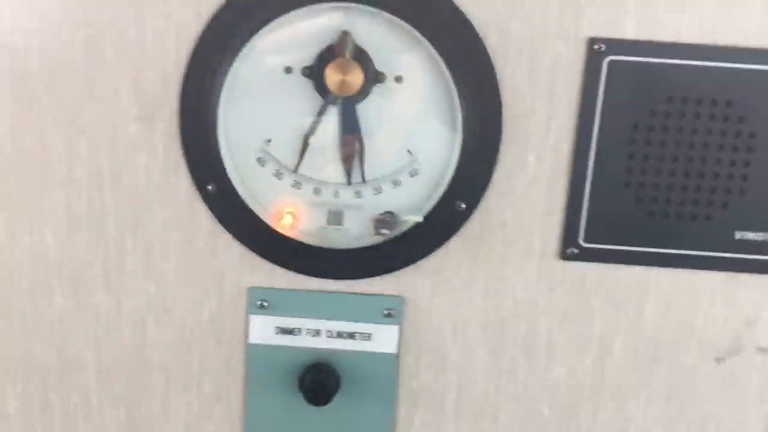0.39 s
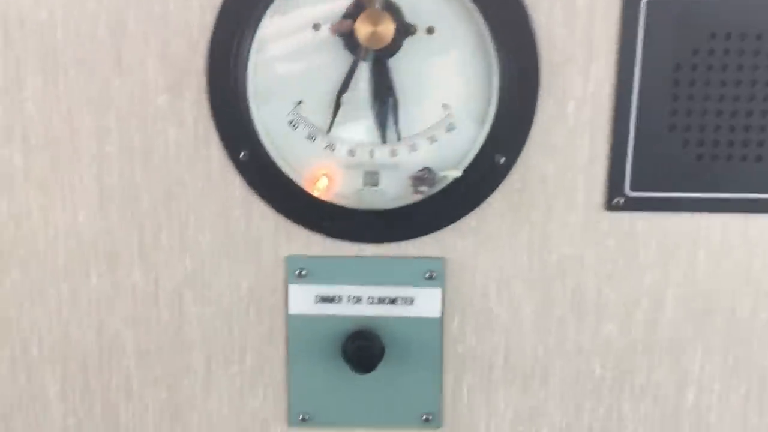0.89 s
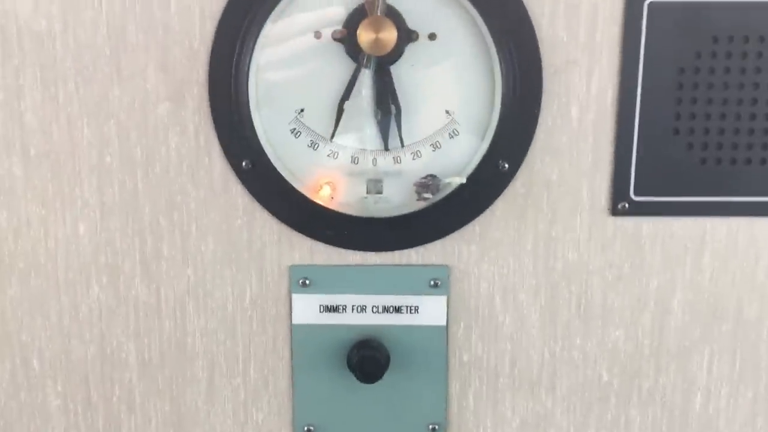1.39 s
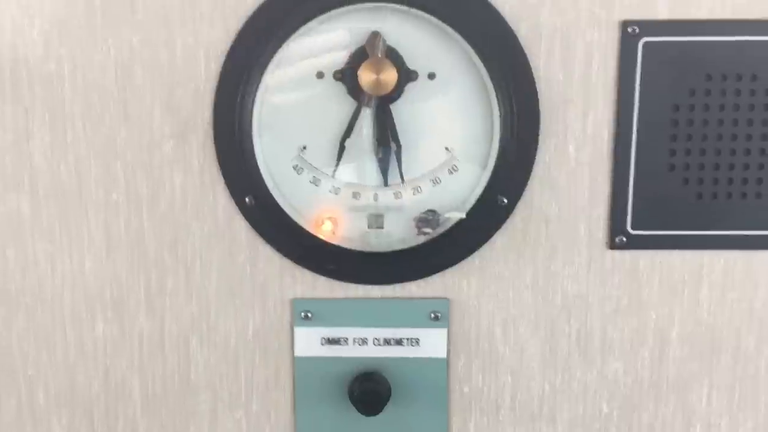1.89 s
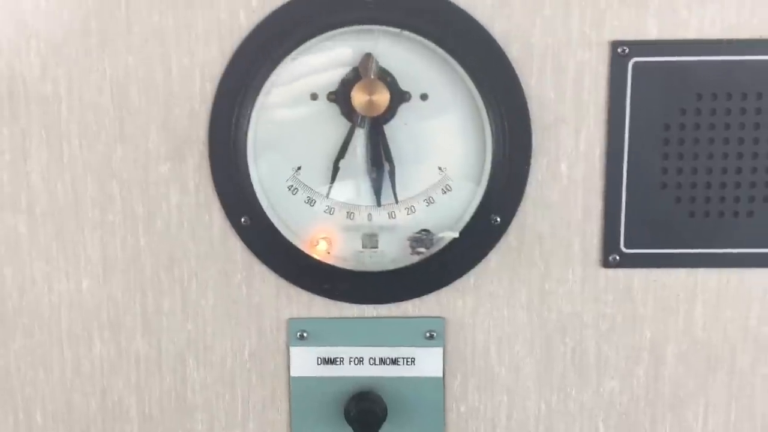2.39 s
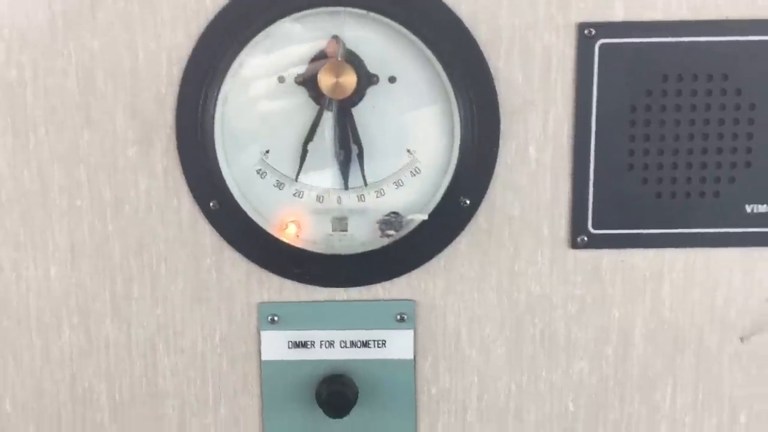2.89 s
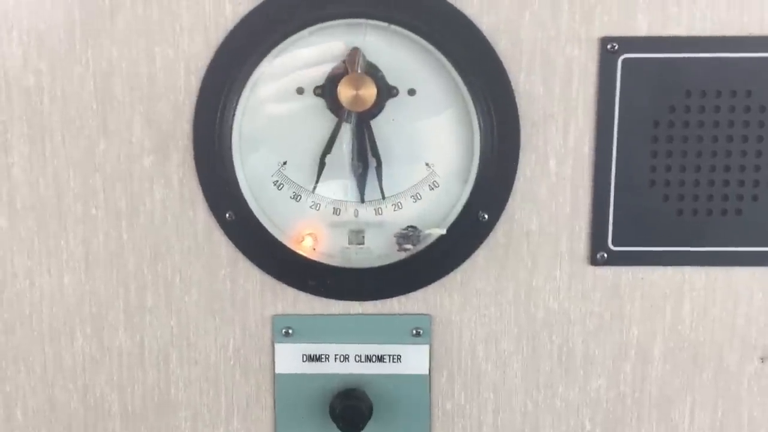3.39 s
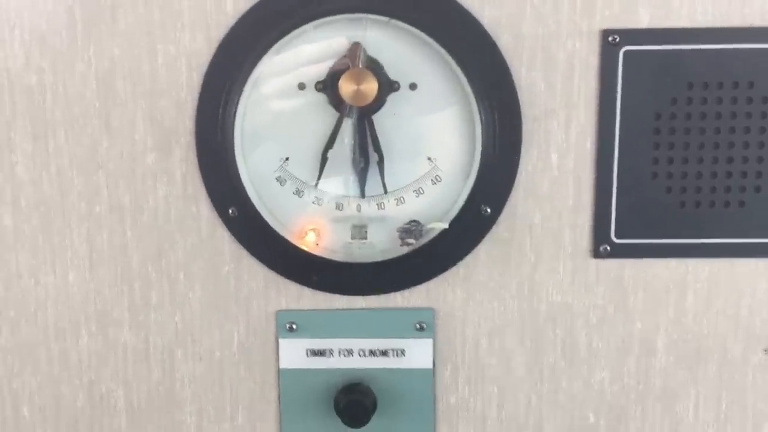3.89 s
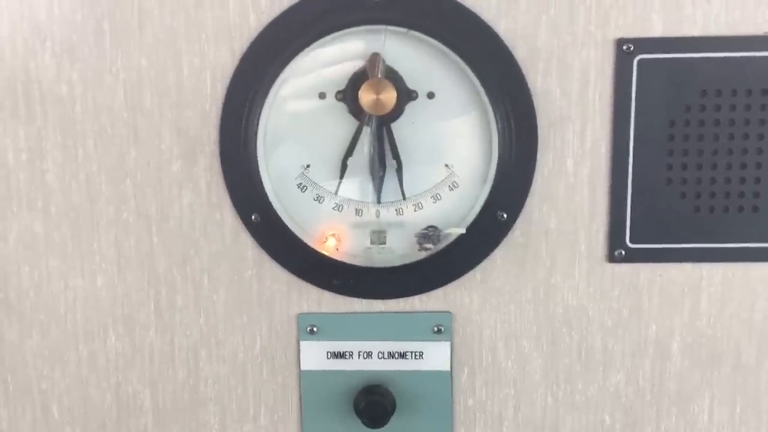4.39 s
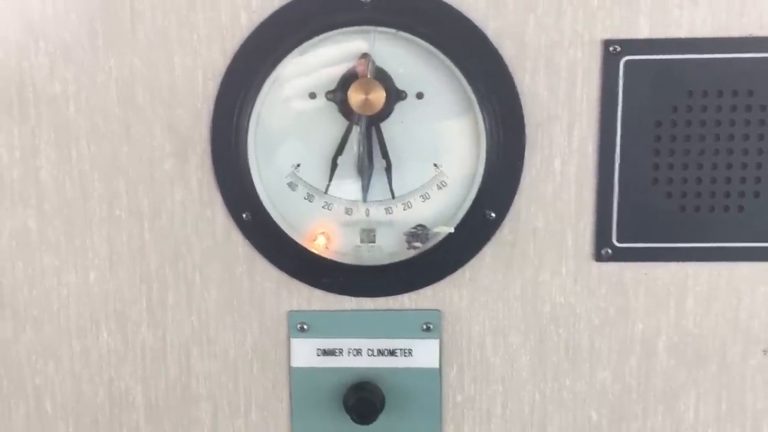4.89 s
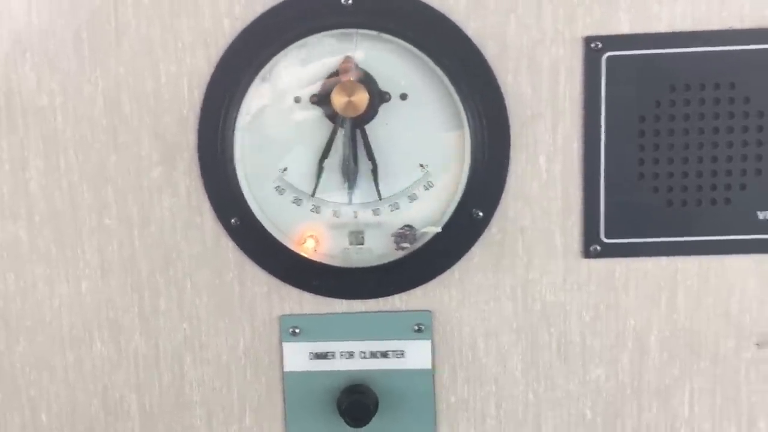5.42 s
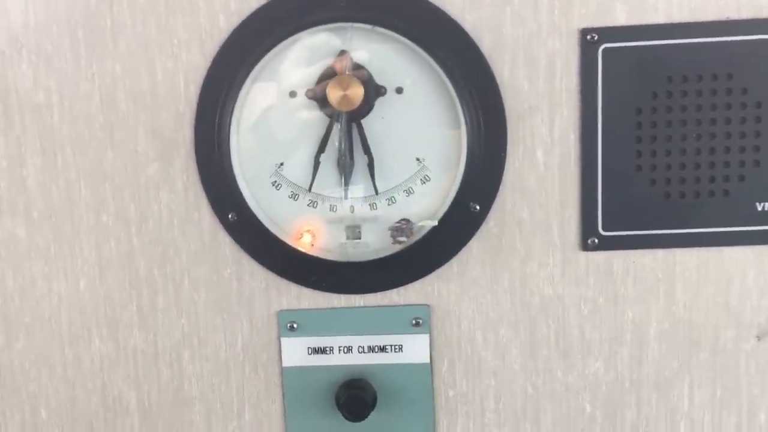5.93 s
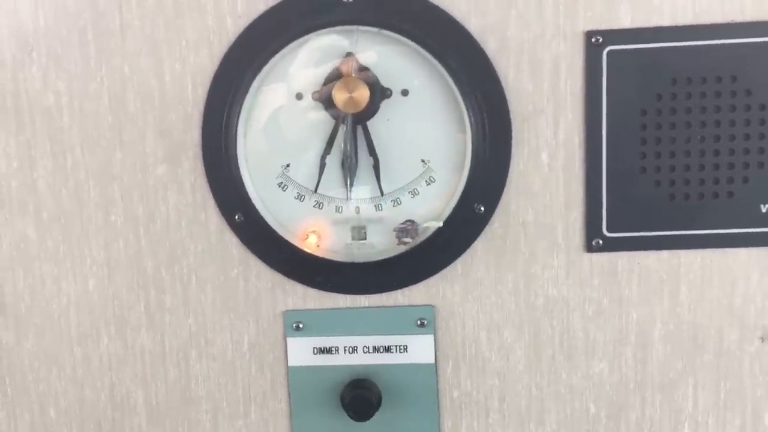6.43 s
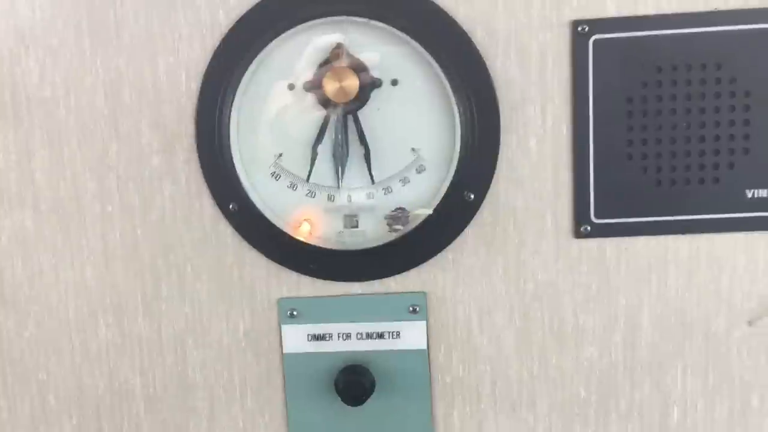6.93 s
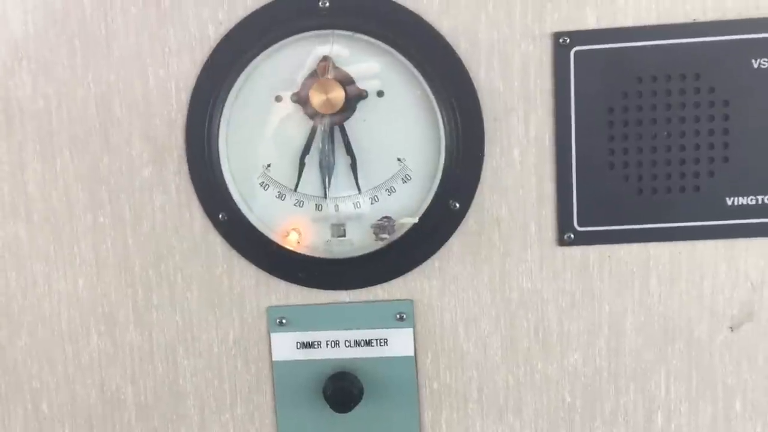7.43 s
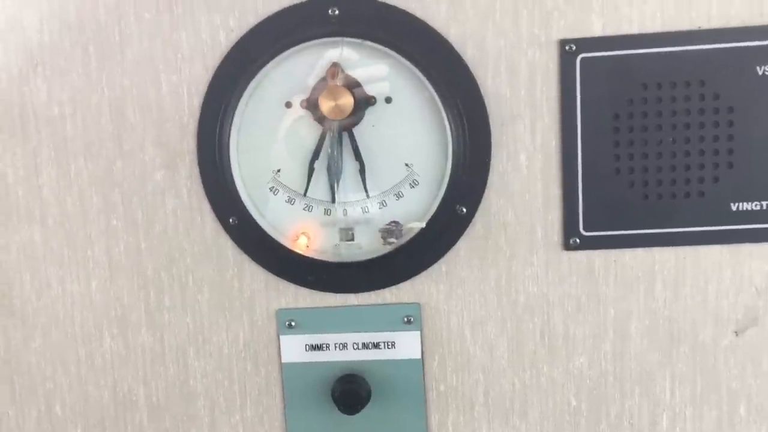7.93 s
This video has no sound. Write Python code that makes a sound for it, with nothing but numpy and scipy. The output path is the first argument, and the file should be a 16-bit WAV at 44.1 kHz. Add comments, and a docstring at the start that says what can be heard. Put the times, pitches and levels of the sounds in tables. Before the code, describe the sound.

Deep ship engine hum throbbing about six times a second inside a steel cabin, with soft ventilation hiss, faint rattles, ticking and an early microphone bump.

```python
"""An eight-cylinder four-stroke diesel, far below a steel ship cabin, hums through the hull: steady tones
that throb together once every engine cycle, because its cylinders fire unevenly. Around it panels drone,
ventilation hisses and thin tones whine, all from shaped noise and wandering sines. Loose fittings tick and
rattle as dying bursts of noise, and early on something rubs and bumps near the microphone."""
import sys
import numpy as np
from scipy import signal
from scipy.fft import rfft, irfft
from scipy.io import wavfile

SR = 44100
rng = np.random.default_rng(int(sys.argv[2]) if len(sys.argv) > 2 else 0)


def nominal_scale(level):
    """Amplitude ratio for a level in decibels (scalar or array-like)."""
    x = np.asarray(level, float) / 20
    return 10 ** x


def to_wav(sig):
    """Store sig (one row per channel, or 1-D mono) as 16-bit WAV at the path in sys.argv[1].

    Samples outside -1..1 are clipped; the rate is SR.
    """
    pcm = np.clip(np.atleast_2d(sig), -1, 1) * 32767
    pcm = np.round(pcm).astype(np.int16)
    wavfile.write(sys.argv[1], SR, pcm.T)  # frames by channels


N = 355005
T = np.arange(N) / SR  # time of each sample (s)
HZ = np.fft.rfftfreq(N, 1 / SR)  # frequencies at which noise is shaped


def evened(x):
    """Scales a sound to rms 1."""
    return x / np.sqrt(np.mean(x ** 2) + 1e-20)


def curve(rows, column=1):
    """One column of a table, joined by straight lines in time."""
    return np.interp(T, np.transpose(rows)[0], np.transpose(rows)[column])


def noise(gain):
    """Noise whose power per Hz is the gain squared."""
    return irfft(rfft(rng.standard_normal(N)) * gain, N) * np.sqrt(SR / 2)


def peak(hz, width):
    """Gain of a steep resonance, down to a half at the edges of its width."""
    return 1 / (1 + ((HZ - hz) / (width / 2)) ** 2)


def peaks(rows):
    """Noise through several resonances at their relative levels, the whole scaled to rms 1."""
    power = sum((nominal_scale(db) * peak(hz, width)) ** 2 / width for hz, width, db in rows)
    return evened(noise(np.sqrt(power)))


def drift(hz):
    """Random wandering of rms 1, mostly slower than hz."""
    return evened(noise(peak(0, hz)))


def wavering(hz, wander, speed_hz):
    """A tone of rms 1 whose pitch drifts by chance."""
    pitch_hz = hz + wander * drift(speed_hz)
    return np.sqrt(2) * np.sin(2 * np.pi * np.cumsum(pitch_hz) / SR)


def dying(events, t60, rise_s):
    """One envelope that jumps at each event (s, dB) and falls by 60 dB in t60 seconds."""
    out = np.zeros(N)
    age = np.arange(SR) / SR
    shape = nominal_scale(-60 * age / t60) * (1 - np.exp(-age / rise_s))
    for s, db in events:
        part = out[round(s * SR):][:SR]
        part += nominal_scale(db) * shape[:len(part)]
    return out


# rumble and ventilation noise before its swells: f/Hz, level/dB (per Hz)
AIR_SPECTRUM = [(12, -79), (20, -76), (26, -62), (36, -62), (52, -58), (68, -61), (80, -64.5), (105, -69),
                (150, -72.5), (175, -77), (330, -78), (400, -83), (520, -85), (750, -86), (1250, -88),
                (1400, -91), (2000, -94), (2600, -97), (2950, -101), (3300, -101), (4500, -105),
                (5000, -109), (7000, -109), (7600, -113), (9800, -116), (10500, -121), (12000, -117),
                (15700, -120.5)]
# slow swells: t/s, level/dB (the hiss near 1.2 kHz), level/dB (the upper panels, in the next function)
SLOW_SWELLS = [(0, 1.4, 0), (1.2, 0.1, 3), (2.4, .5, 1), (3.2, 1, 1.5), (5, 1.5, 1.5), (6.1, 2.1, -0.2),
               (6.6, -1.1, 0.3), (8.05, 1, -1)]
TREBLE_DB = -3  # middle level of the treble and the top, against the spectrum


def air():
    """Broad noise in four parts: steady bass, a swelling middle, a flickering treble and top."""
    hz, db = np.transpose(AIR_SPECTRUM)
    gain = nominal_scale(np.interp(np.log(HZ + 1), np.log(hz), db))
    # share of the power above each dividing frequency; neighbours differ by one part's share
    above = [1] + [1 / (1 + (edge_hz / (HZ + 1)) ** 4) for edge_hz in (750, 2600, 7500)] + [0]
    bass, middle, treble, top = (noise(gain * np.sqrt(abs(a - b))) for a, b in zip(above, above[1:]))
    shared_db = drift(25)  # flicker that middle, treble and top have in common
    treble_db = TREBLE_DB + 0.6 * drift(1.5)
    middle = middle * nominal_scale(curve(SLOW_SWELLS) + 1.2 * shared_db)
    treble = treble * nominal_scale(treble_db + 0.98 * shared_db + 0.65 * drift(25))
    top = top * nominal_scale(treble_db + 0.41 * shared_db + 1.2 * drift(25))
    return bass + middle + treble + top


# hull and wall panels, before any swell: f/Hz, width/Hz, level/dB (rms)
PANEL_BANDS = [(48, 3, -47), (40, 4, -53), (66, 6, -52), (94, 5, -56), (131, 6, -64), (185, 15, -64),
               (236, 14, -64), (270, 20, -63), (303, 10, -64), (325, 18, -61), (372, 14, -63),
               (450, 30, -65), (487, 16, -64), (590, 60, -65), (680, 80, -67)]


def panels():
    """Each panel picks a narrow band out of the rumble; those above 200 Hz wax and wane."""
    swell = nominal_scale(curve(SLOW_SWELLS, column=2))
    out = np.zeros(N)
    for hz, width, db in PANEL_BANDS:
        drone = nominal_scale(db) * evened(noise(peak(hz, width)))
        out += drone * swell if hz > 200 else drone
    return out


# two panel notes: f/Hz, wander/Hz
DRONE_NOTES = [(289, 1.8), (352, 2.5)]
# how they come and go, before wavering: t/s, level/dB (lower note, rms), level/dB (upper note, rms)
DRONE_SWELLS = [(0, -59, -58), (.9, -70, -56.5), (1.2, -70, -61), (1.7, -65, -54), (2.05, -65, -57),
                (2.3, -56, -60), (3.2, -57, -63.5), (3.4, -54, -54.5), (3.7, -77, -55), (4.3, -58.5, -60),
                (4.75, -60, -62), (4.9, -54, -59.5), (5.35, -57.5, -57), (5.65, -72, -72), (6.6, -61, -60),
                (7.2, -79, -69), (8.05, -62.5, -68)]
DRONE_WAVER_DB = 3.5


def drones():
    """Two panels sing nearly pure notes, unsteady in pitch and level."""
    out = np.zeros(N)
    for column, (hz, wander) in enumerate(DRONE_NOTES, start=1):
        note = wavering(hz, wander, speed_hz=7.98) * nominal_scale(DRONE_WAVER_DB * drift(14))
        out += note * nominal_scale(curve(DRONE_SWELLS, column))
    return out


# thin whines of fans and electrics, before swell and wavering: f/Hz, level/dB (rms), wander/Hz
WHINE_TONES = [(1428, -79, 3), (1657, -80, 3), (2370, -81, 3), (2822, -88, 3), (4225, -87, 2),
               (6842, -96, 2), (7047, -92, 1.5)]
# two whines that come and go: t/s, level/dB (the one near 4.2 kHz), level/dB (the one near 7 kHz)
WHINE_SWELLS = [(0, 7.5, -7), (1.5, 1.5, 2), (2.3, -5.5, -4), (2.55, 9.5, -2), (3.8, 5, 5), (4.5, 5, 5),
                (5.5, -2, -5), (6.9, 3, -4), (7.2, -8, -5)]


def whines():
    """Thin tones that wander a little in pitch and level."""
    swells = {4225: curve(WHINE_SWELLS), 7047: curve(WHINE_SWELLS, column=2)}  # by frequency in Hz
    out = np.zeros(N)
    for hz, db, wander in WHINE_TONES:
        level_db = db + swells.get(hz, 0) + 2.1 * drift(1.5)
        out += wavering(hz, wander, speed_hz=3.16) * nominal_scale(level_db)
    return out


# rattles of loose fittings, before rise, fade and flutter:
# t/s, level/dB, dullness/dB, metal ring level/dB (relative), top level/dB (relative)
RATTLE_EVENTS = [(.039, -68, 6, -12, -7.5), (.32, -71, 9.5, -12, -5), (.333, -82, -6, -12, -2.5),
                 (.396, -71, 3, -12, -3.5), (.622, -69, 4, -15, -5), (1.083, -71.5, 9, -13, -5),
                 (2.585, -72, 3, -12, -10), (3.01, -74.5, 6, -12, -5.5), (3.57, -79, 5, -12, -3),
                 (5.109, -73, -5, 6, -5), (5.231, -81, -13, -5, -7), (5.353, -75, 0, 7, -7),
                 (5.47, -77.5, 9, -8, -9), (5.638, -68.5, 11, -12, -13), (5.758, -73.5, -9, -6, -1.5),
                 (5.837, -68.5, -3, 2, -9), (5.864, -78, 2, 1, -11), (5.92, -81, -3, 2, -4),
                 (6.067, -76.5, 3, -9, -9), (6.11, -77, 7, -14, -6), (6.3, -81, 1.5, -7, -3),
                 (6.68, -80, -1, -12, -3.5), (7.031, -68, 8.5, -10, -12), (7.47, -77, 10, -12, -7),
                 (7.657, -78.5, 9, -15, -7), (7.85, -82, 2, -17, -3)]
# noise bands of a rattle: f/Hz, width/Hz, share of the dullness, share of the top level
PUFF_BANDS = [(1900, 1600, 1.63, 0.32), (3800, 2200, 0.8, 0.077), (6100, 2000, 0, 0.15),
              (8550, 4900, 0, 0.12), (11600, 1800, 0, 1), (14500, 3000, 0, 1)]
# metal ring: f/Hz, width/Hz, level/dB (relative)
RING_MODES = [(6550, 300, -2), (6950, 350, 0)]
RATTLE_T60, RING_T60 = 0.29, 0.29  # s


def rattles():
    """Each rattle is a grainy puff of patchy colour, with a metal ring that swells in more slowly."""
    s, db, dull_db, ring_db, top_db = np.transpose(RATTLE_EVENTS)
    ring_envelope = dying(zip(s, db + ring_db), RING_T60, rise_s=0.0067)
    out = peaks(RING_MODES) * ring_envelope * nominal_scale(3.2 * drift(60))
    for hz, width, dull, top in PUFF_BANDS:
        envelope = dying(zip(s, db + dull * dull_db + top * top_db), RATTLE_T60, rise_s=0.003)
        # each band flutters on its own, so no two rattles have the same colour
        flutter_db = 2.8 * drift(250) + 1.3 * drift(30)
        out += peaks([(hz, width, 0)]) * envelope * nominal_scale(flutter_db)
    return out


# a fitting chatters about ten times a second for a while, before rise and fade: t/s, level/dB
TICK_EVENTS = [(3.328, -69.5), (3.67, -81), (3.763, -69.5), (3.864, -67.5), (3.953, -75), (4.132, -67),
               (4.32, -70), (4.416, -70), (4.52, -69), (4.605, -69.5), (4.701, -66.5), (4.798, -65.5),
               (4.89, -68), (4.974, -71.5)]
# what the fitting rings at: f/Hz, width/Hz, level/dB (relative)
FITTING_MODES = [(2280, 510, -3), (4130, 1200, 0), (5400, 730, -4), (6200, 500, -5), (9350, 5000, -5.5)]
TICK_T60 = 0.25  # s
CRACKLE_DB, CRACKLES_PER_S = -83.5, 88  # fine crackle: level of the smallest before it waxes and wanes, rate


def ticks():
    """Clear ticks, and a random crackle that waxes and wanes, ring the same dull modes."""
    clear = dying(TICK_EVENTS, TICK_T60, rise_s=0.00099)
    sizes = nominal_scale(CRACKLE_DB + 2.6 * rng.exponential(1, N).clip(0, 4) + 2.3 * drift(1.5))
    hits = sizes * (rng.random(N) < CRACKLES_PER_S / SR)
    fade = np.exp(-1 / (0.0084 * SR))  # each crackle dies with a time constant of 8.4 ms
    crackle = signal.lfilter([1], [1, -fade], hits)
    return peaks(FITTING_MODES) * (clear + crackle)


# scratch bands and squeaks: f/Hz, width/Hz, level/dB (relative)
RUB_BANDS = [(3080, 250, -6.5), (4160, 220, -7.5), (5200, 200, -12), (4000, 3300, -2.5), (7500, 400, -8),
             (8000, 4400, -2.5), (10100, 150, -19), (11900, 350, -9), (14000, 150, -21)]
RUB_S, RUB_HOLD_S, RUB_DB = 0.678, 0.074, -64  # moment of full level, how long it holds, overall gain
RUB_RISE_DB_PER_S, RUB_FALL_DB_PER_S = 330, 179


def rub():
    """A scratchy hiss with thin squeaks; each band catches and slips on its own."""
    early_s = np.clip(RUB_S - T, 0, None)
    late_s = np.clip(T - RUB_S - RUB_HOLD_S, 0, None)
    hiss = sum(nominal_scale(db + 2.8 * drift(100)) * peaks([(hz, width, 0)]) for hz, width, db in RUB_BANDS)
    return hiss * nominal_scale(RUB_DB - RUB_RISE_DB_PER_S * early_s - RUB_FALL_DB_PER_S * late_s)


# soft knocks on the microphone's housing: t/s, level/dB
KNOCK_EVENTS = [(0.613, -35), (.641, -29.5), (.672, -45), (.698, -29), (.717, -36.5)]
# notes of the housing: f/Hz, level/dB (relative), time to fall by 60 dB/s
HOUSING_MODES = [(82, -7, 0.32), (111.6, -1.5, 0.32), (147.6, -5, 0.27), (193, -5, .16)]
FIRST_TOP_DB, DULLING_DB_PER_S = 3, 220  # boost of the highest mode at the first knock, and its loss


def knocks():
    """Each knock rings the low modes of the housing; the higher a mode, the more later knocks lose it."""
    out = np.zeros(N)
    low_hz, top_hz = HOUSING_MODES[0][0], HOUSING_MODES[-1][0]
    for s, db in KNOCK_EVENTS:
        age = np.clip(T - s, 0, None)  # zero, hence silent, before the knock
        top_db = FIRST_TOP_DB - DULLING_DB_PER_S * (s - KNOCK_EVENTS[0][0])
        for hz, mode_db, t60 in HOUSING_MODES:
            bright_db = top_db * ((hz - low_hz) / (top_hz - low_hz)) ** 2
            level_db = db + mode_db + bright_db - 60 * age / t60
            out += nominal_scale(level_db) * np.sin(2 * np.pi * hz * age)
    return out


# engine tones before the slow level: order (multiple of the cycle rate), level/dB (rms),
# t/s (a moment when it swings in step with the nearest firing harmonic)
ENGINE_ORDERS = [(7, -37, .057), (8, -29, 0), (9, -39, .042), (10, -49, .003), (11, -57, .011),
                 (12, -61, .014), (14, -63, .079), (15, -50, .157), (16, -42, 0), (17, -56, .094),
                 (19, -62, .015), (22, -63, .044)]
# slow level of the hum: t/s, level/dB
HUM_SWELL = [(0, 1.5), (1.3, 1), (3.6, 0.2), (6.2, 0), (7.3, -1), (8.05, 2.5)]
CYCLE_HZ, CYLINDERS = 5.9903, 8
FIRING_S, HUM_WAVER_DB = 0.0104, 0.5  # a moment when the firing pressure crests; random wavering of level


def engine():
    """Clean orders of the cycle; those beside a firing harmonic beat with it once a cycle: the throb."""
    hum = np.zeros(N)
    for order, db, crest_s in ENGINE_ORDERS:
        # nearest multiple of the cylinder count, at least one; the small offset settles ties downwards
        firing = CYLINDERS * max(round(order / CYLINDERS - 1e-3), 1)
        turns = CYCLE_HZ * (firing * (T - FIRING_S) + (order - firing) * (T - crest_s))
        hum += np.sqrt(2) * nominal_scale(db) * np.cos(2 * np.pi * turns)
    return hum * nominal_scale(curve(HUM_SWELL) + HUM_WAVER_DB * drift(2.5))


def scene():
    """All sources added up, heard by one microphone."""
    background = air() + panels() + drones() + whines()
    handling = rub() + knocks()
    return (background + rattles() + ticks() + handling + engine())[None]


def roll_off(x):
    """The treble ends steeply here."""
    return signal.sosfilt(signal.butter(12, 15710, fs=SR, output="sos"), x)


def record(dry):
    """Turns the finished mix into the sound that is kept."""
    return roll_off(dry)


dry = scene()
out = record(dry)
to_wav(out)
```